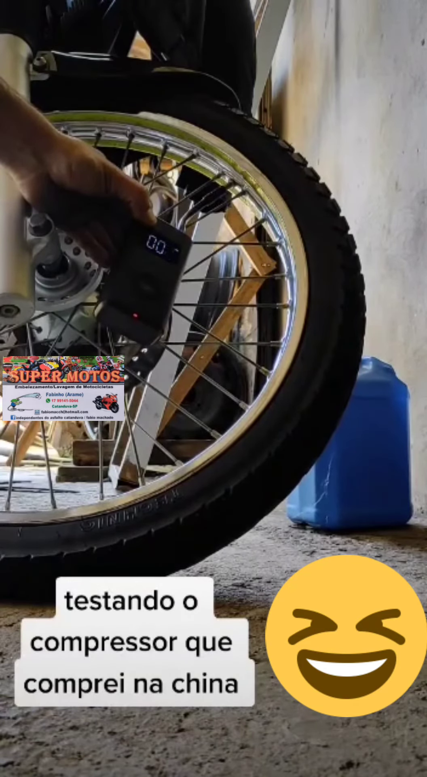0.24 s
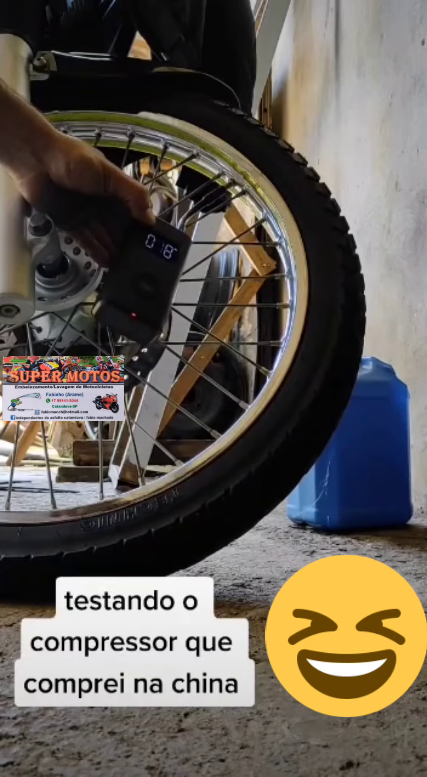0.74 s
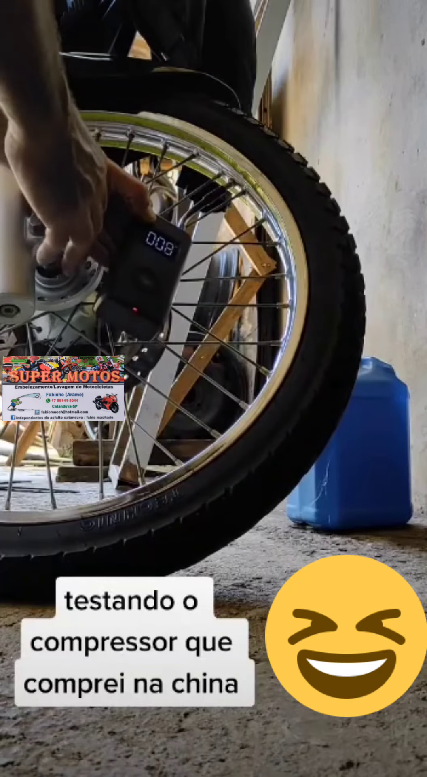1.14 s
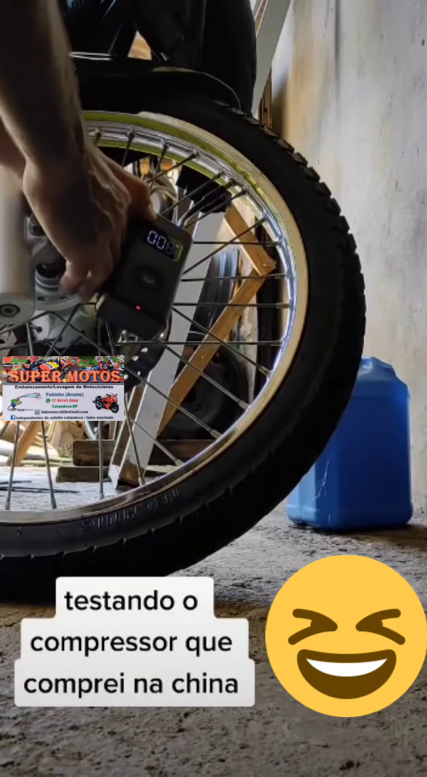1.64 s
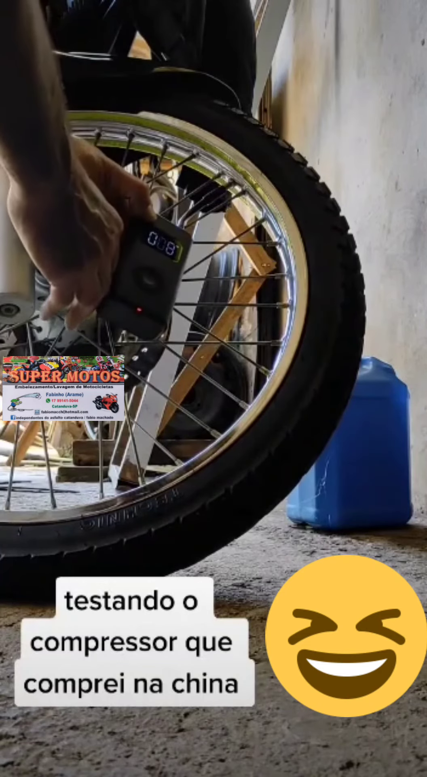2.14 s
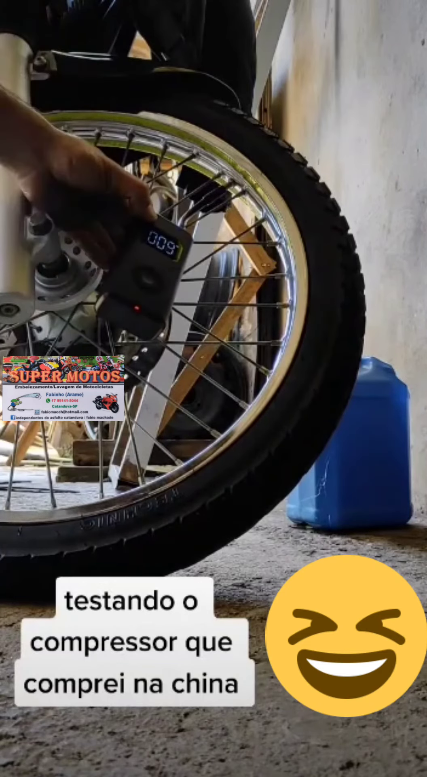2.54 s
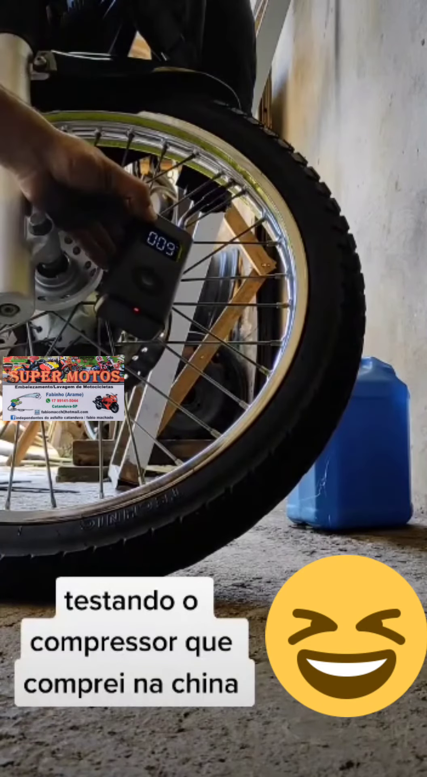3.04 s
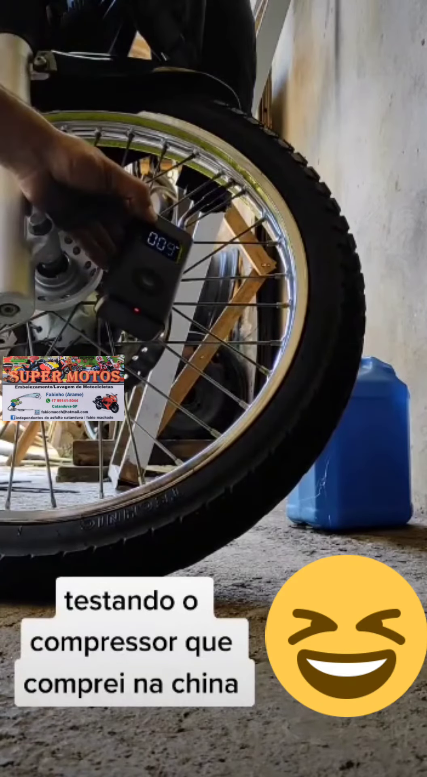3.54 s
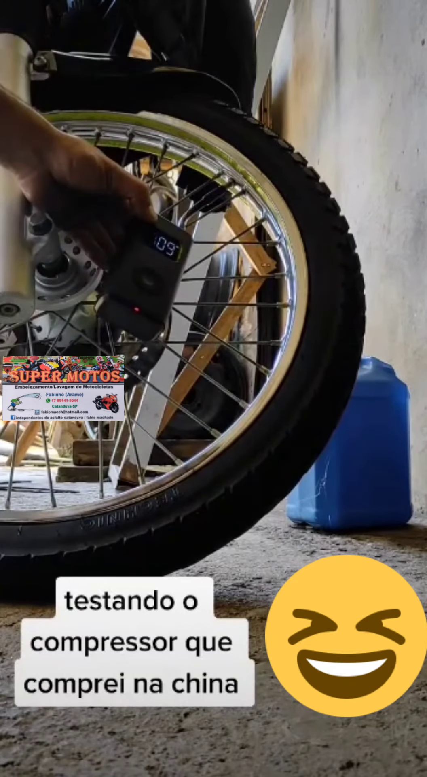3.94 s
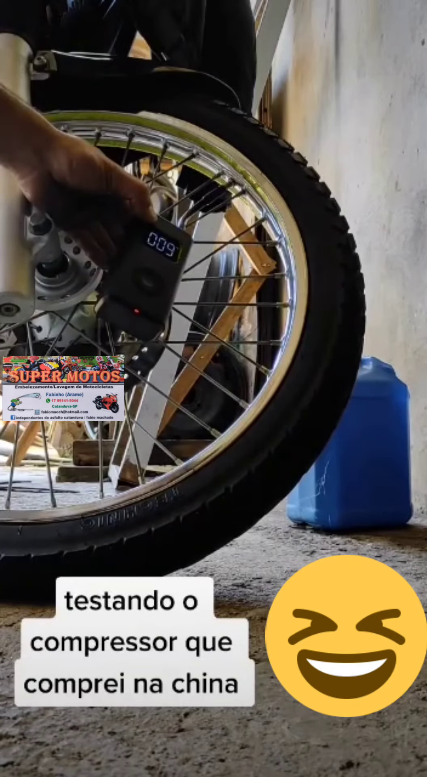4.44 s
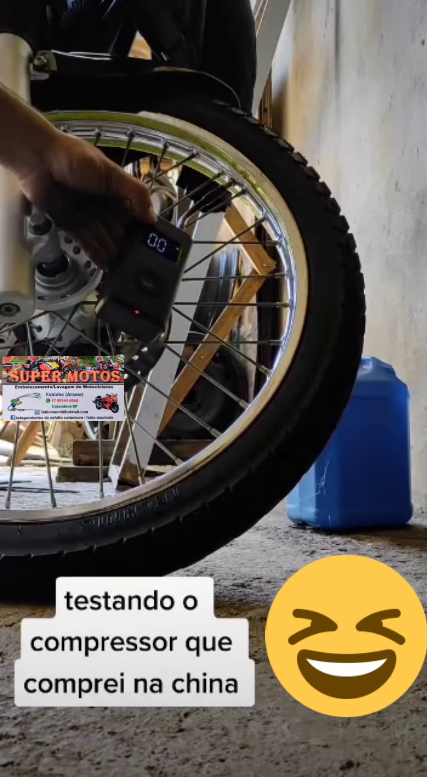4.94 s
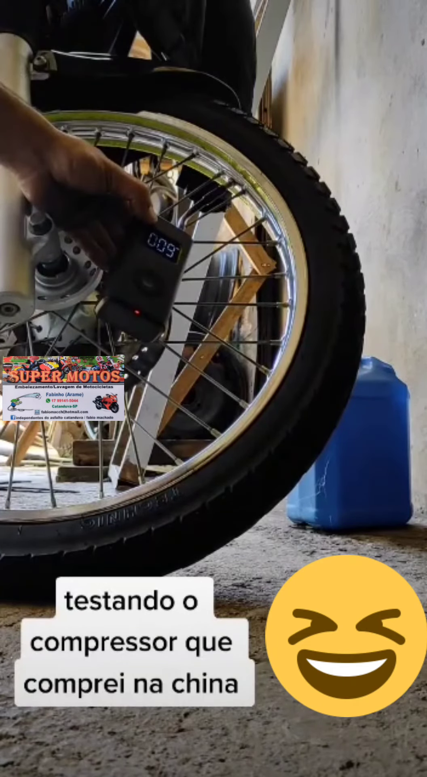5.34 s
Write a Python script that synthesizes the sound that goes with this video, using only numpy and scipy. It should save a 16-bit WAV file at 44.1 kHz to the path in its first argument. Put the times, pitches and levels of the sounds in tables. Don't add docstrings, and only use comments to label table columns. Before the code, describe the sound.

A small electric piston pump is already running at 0 s and continues for about 5.6 s without a gap. Close to the phone, roughly forty-four strokes a second blend into a hard, rattling buzz: low thump, metallic casing rings and a sharp valve tick in every turn, with gritty gear and air noise pulsing along. The pitch sinks very slightly, from about 44.6 to 44.3 turns per second, as pressure builds. Around 2.5 s a tighter grip gradually dulls the ring near 2.2 kHz. Fingers sliding over the vents make tiny dips and flares in brightness throughout. The treble is grainy, patchy and watery like heavy compression, with small high pips, densest around 0.9-1.7 s and 2.9-3.8 s. A stronger whistle near 7 kHz appears at 3.1-3.5 s, then a fainter, slightly higher one holds to the end. Stereo leans left, with little audible room; it stops abruptly mid-run.

```python
import sys
import numpy as np
from scipy import signal
from scipy.fft import rfft, irfft
from scipy.io import wavfile
from scipy.ndimage import uniform_filter1d

SR = 44100
rng = np.random.default_rng(int(sys.argv[2]) if len(sys.argv) > 2 else 0)


def level_to_linear(level):
    exponent = np.asarray(level, float) / 20
    return 10 ** exponent


def put_to_file(sound):
    columns = np.atleast_2d(sound).T
    safe = np.clip(columns, -1, 1)
    whole_steps = np.round(safe * 32767)
    wavfile.write(sys.argv[1], SR, whole_steps.astype(np.int16))


N = 246078
HZ = np.fft.rfftfreq(N, 1 / SR)
T = np.arange(N) / SR
FRAME = 1024

# (frequency [Hz], left [dB], right [dB], likeness [0-1])
BASS_PATH = [(25, -5.5, -19.5, 0.91), (45, -11.5, -12.5, 0.94), (130, -8.5, -14.5, 0.87),
             (241, -4, -8.5, 1), (323, -4.5, -9.5, 0.8), (477, -3, -8, 0.94), (710, 4, -4, 0.88),
             (930, 5.5, -4.5, 0.89), (1204, 2.5, -1.5, 0.5), (1420, 2, -9, 0.65), (1690, -0.5, -2, 0.03),
             (1620, -7.5, -3, 0.7), (2030, 2.5, 1, 0.3), (2240, 5.5, 6.5, 1)]
CASING_PATH = [(2380, -14, -2.5, 0.75), (2410, -2.5, 4, 0.39), (2833, -0.5, -8.5, 0.4),
               (3217, -14.5, -13, 0.49), (3475, -8.5, -10, 0.28), (3620, -17.5, -17.5, 0.47),
               (4427, 0, -8.5, 0.27), (4620, -14, -2.5, 0.46), (4700, -4, -8.5, 0.38), (5116, -4, -8, 0.44),
               (5270, -13, -21, 0.55), (5430, -3, -4, .45), (5710, -17, -17, 0.56),
               (5820, -2.5, -5.5, 0.62), (5940, -8.5, -10, .5), (6336, 4.5, -8.5, 0.98),
               (6423, 10.5, 10.5, 0.8)]
# (from [Hz], to [Hz], moved up by [Hz])
COPIES = [
    (1033.6, 6546.1, 5512.5),
    (2411.7, 5857, 9646.9),
]
# (start [s], end [s], frequency [Hz], level [dB])
HELD_TONES = [
    (2.8, 3.12, 13953.5, -48),
    (4.85, 5.58, 13953.5, -49),
    (3.1, 3.5, 7062.9, -31),
    (3.5, 5.58, 7752, -40),
    (0, .67, 12575, -55),
    (.95, 1.15, 12575, -55),
    (3.38, 4.1, 12575, -55),
]


def read(points, at, column=1):
    rows = np.transpose(points)
    return np.interp(np.log(at + 1), np.log(rows[0] + 1), rows[column])


def gains(path):
    return np.array([level_to_linear(read(path, HZ, column=side) - 60) * np.sqrt(SR / 2) for side in (1, 2)])


def wander(rate_hz, count=1):
    points = rng.standard_normal((count, 400))
    return np.array([np.interp(T * rate_hz, np.arange(400), p) for p in points]) * 1.22


def ports(z, path):
    # (frequency [Hz], lead [half turns])
    port_lead = [(950, 0), (1550, -1.15), (1890, -1), (2300, -2), (12100, -2), (13800, -1), (15100, -1),
                 (15500, -2)]
    lag_s = np.arange(4096) / SR
    reflections = rng.standard_normal(4096) * level_to_linear(-60 * lag_s / 0.054)
    smear = np.exp(1j * np.angle(rfft(reflections, N)))
    drift = np.exp(3j * wander(6)[0])
    other = rfft((signal.hilbert(irfft(z * smear, N)) * drift).real)
    half_angle = np.arccos(np.clip(read(path, HZ, column=3), 0, 1)) / 2
    shared, apart = np.cos(half_angle) * z, np.sin(half_angle) * other
    lead = np.exp(-1j * np.pi * read(port_lead, HZ))
    both = np.array([shared + apart, lead * (shared - apart)])
    return irfft(both * gains(path), N)


def tones():
    # (frequency [Hz], level [dB], chance per frame [0-1], left-right [dB])
    whistles = [
        (7062.9, -59, .4, 3),
        (7490, -33.5, 0.32, 2),
        (13953.5, -54, 0.18, 12),
    ]
    # (time [s], peak level [dB])
    pips = [(0.2443, -51), (0.3606, -33), (0.6659, -45), (0.7567, -36), (0.915, -28), (1.34, -32),
            (1.2072, -28), (1.2555, -21), (1.2945, -27), (1.475, -28), (1.6107, -30), (1.6616, -32),
            (2.0517, -44), (2.6339, -56), (2.8699, -35), (3.1378, -32), (3.2585, -31.5), (3.5663, -23.5),
            (3.32, -29.5), (3.7923, -33), (1.0, -49), (3.9799, -51), (4.131, -52), (4.2487, -41),
            (4.86, -40), (5.4635, -35)]
    pip_hz = 9819.1
    out, frame = np.zeros((2, N)), np.arange(N) // (2 * FRAME)
    for hz, db, chance, pan_db in whistles:
        on = uniform_filter1d(1. * (rng.random(200) < chance)[frame], 200)
        side_db = np.array([[pan_db], [-pan_db]]) / 2
        out += level_to_linear(db + side_db) * on * np.sin(2 * np.pi * hz * T)
    for start, end, hz, db in HELD_TONES:
        on = uniform_filter1d(1. * ((T > start) & (T < end)), 400)
        out += level_to_linear(db) * on * np.sin(2 * np.pi * hz * T) * [[1.4], [.6]]
    gate = np.full(N, level_to_linear(-66))
    for s, db in pips:
        gate += level_to_linear(db) * np.exp(-((T - s - .011) / .010) ** 4)
    return out + level_to_linear([[3], [-5]]) * gate * np.sin(2 * np.pi * pip_hz * T)


def fingers(hz, t):
    # (time [s], length [s], centre [Hz], level [dB])
    moves = [(0.1, .05, 7400, -6.5), (1.14, 0.027, 7000, -4), (1.21, 0.015, 6600, -10),
             (1.35, 0.059, 7900, 4), (1.6, .02, 6800, -13), (1.72, .03, 8300, -2.5), (1.98, 0.078, 8060, 3),
             (2.14, .03, 8100, -3.5), (2.434, 0.046, 7800, -3.5), (3.256, 0.012, 7600, -12),
             (3.277, .021, 7600, 5.5), (3.376, 0.068, 7700, -8.5), (3.488, 0.096, 6550, -2.5),
             (3.53, .03, 8400, -5), (4.065, 0.033, 8100, 5), (4.256, .022, 8000, -5),
             (4.865, 0.048, 8400, -5.5), (5.46, 0.029, 8600, -2.5)]
    width_hz = 1140
    change_db = 0
    for s, length, mid_hz, db in moves:
        band = np.exp(-((hz - mid_hz) / width_hz) ** 2)
        moment = np.exp(-((t - s) / length) ** 2)
        change_db = change_db + db * np.outer(band, moment)
    return change_db


def rebuilt(mono):
    # (frequency [Hz], left [dB], right [dB], likeness [0-1])
    treble_path = [(7140, 6, 2, 0.94), (6950, 2, 0.5, 0.91), (7190, 10, 12.5, 0.99), (7244, -3, -1, 0.9),
                   (7420, -7, -9, 0.8), (7630, -9, -3, 0.7), (7750, 13.5, -3, 0.38), (7830, -2, -6, 0.62),
                   (7994, 11, 7, 0.75), (8474, 8.5, -8, 0.29), (8790, -10.5, -17, 0.28),
                   (9090, -0.5, -16, 0.18), (9180, -18, -30, 0.21), (9860, -8.5, -28, 0.14),
                   (10100, -23.5, -29, 0.35), (10560, -14.5, -21, 0.01), (11100, -7.5, -21, 0.11),
                (11100, -14, -16, 0.07), (12430, -10.5, -19, 0.08), (12300, -16, -24, 0.28),
                (12500, -19, -32, 0.32), (13400, -12, -20, .3), (13500, -27, -37, 0.11),
                (13520, -14, -26, 0.31), (14040, -6.5, -24, 0.35), (15400, -15.5, -9, 0.29),
                (15700, -19, -27, 0.7)]
    z, flat = rfft(mono), np.zeros(len(HZ), complex)
    for low_hz, high_hz, up_hz in COPIES:
        a, b, up = (round(f * N / SR) for f in (low_hz, high_hz, up_hz))
        flat[a + up:b + up] = z[a:b] / np.sqrt(uniform_filter1d(abs(z[a:b]) ** 2, 900) / N)
    hz, t, z = signal.stft(ports(flat, treble_path), SR, nperseg=256)
    frame, band = (t * SR / FRAME).astype(int), (hz / 689).astype(int)
    steps = rng.standard_normal((300, 2, 40))[frame][:, :, band]
    steps_db = 1.1 * steps[:, :1] + 1.06 * steps
    level_db = steps_db.transpose(1, 2, 0) + fingers(hz, t) - 1
    return signal.istft(z * level_to_linear(level_db), SR, nperseg=256)[1][:, :N]


def thinned(x):
    # (frequency [Hz], level against the neighbourhood [dB], wander [dB])
    threshold = [(900, -24, 3), (1800, -8, 3), (3000, -5, 3), (3700, -2, 3), (4300, -6, 3), (5600, -2, 4.5),
                 (6800, -11, 3), (8500, -11, 3), (9200, -10, 6), (9700, -3, 9), (10300, 2, 7),
                 (11500, -3, 5), (13500, -6, 4), (14500, -5, 3), (15500, 3, 4)]
    # (start [s], end [s], from [Hz], to [Hz])
    slots = [(0, .67, 12150, 13000), (.95, 1.15, 12150, 12900), (3.38, 4.1, 12150, 13000),
             (2.8, 3.12, 13150, 14250), (4.88, 5.6, 13150, 14250), (2.85, 3.15, 11400, 11800),
             (4.9, 5.5, 5600, 5950), (.78, .88, 9250, 11000), (1.5, 1.6, 9250, 11000),
             (1.9, 2.04, 9250, 10500), (2.15, 2.22, 9250, 11000), (3.63, 3.75, 1800, 2050)]
    spared_hz = 70
    pair = np.array([[1, 0.93], [1, -1.03]])
    hz, t, z = signal.stft(pair @ x / 2, SR, nperseg=2048, noverlap=1536)
    patch = uniform_filter1d(rng.standard_normal(z[0].T.shape), size=24, axis=0)
    patch = uniform_filter1d(patch, size=7, axis=1).T
    patch_db = np.interp(hz, [1200, 3000, 9000, 11000], [0, 2.2, 2, 3])[:, None]
    z = z * level_to_linear(patch_db * patch / patch.std())

    power = uniform_filter1d(abs(z) ** 2, size=3, axis=2)
    near = uniform_filter1d(power, size=5, axis=1)
    around = uniform_filter1d(power.mean(0), size=41, axis=0)
    around = uniform_filter1d(around, size=9, axis=1)
    band = np.arange(len(hz)) // np.where(hz < 9000, 16, 32) + 30 * (hz >= 9000)
    drift = uniform_filter1d(rng.standard_normal((len(t), 70)), size=8, axis=0)[:, band].T
    wander_db = read(threshold, hz, column=2)[:, None] * drift / drift.std()
    keep = near > around * level_to_linear(2 * (read(threshold, hz)[:, None] + wander_db))
    spared = abs(hz[:, None] - np.transpose(HELD_TONES)[2]).min(1) < spared_hz
    for start, end, low_hz, high_hz in slots:
        emptied = (hz > low_hz) & (hz < high_hz) & ~spared
        keep = keep & ~np.outer(emptied, (t > start) & (t < end))
    return pair @ signal.istft(z * keep, SR, nperseg=2048, noverlap=1536)[1][:, :N]


def grind(turn):
    # (place [turns], level over the grind [dB], length [turns])
    flares_and_dips = [
        (.01, -2, .025),
        (.58, 3, 0.022),
        (.78, -3, 0.02),
        (.92, -8.5, 0.022),
    ]
    # (frequency [Hz], level against the mean [dB])
    grind_colour = [(30, -1), (80, -4.5), (300, -7.5), (900, -7.5), (1500, -4), (2300, -5.5), (3500, 1),
                    (6500, -2.5)]
    place = turn % 1
    level_db = 2.4 * np.cos(2 * np.pi * (place - .85)) + .5 * wander(40)[0]
    force = 1 + 0.11 * rng.standard_normal((300, len(flares_and_dips)))
    for k, (at, db, length) in enumerate(flares_and_dips):
        off = (place - at + .5) % 1 - .5
        this_turn = np.round(turn - at + 2).astype(int)
        level_db += db * force[this_turn, k] * np.exp(-(off / length) ** 2)
    noise = rng.standard_normal(N) * level_to_linear(level_db)
    return irfft(rfft(noise / noise.std()) * level_to_linear(read(grind_colour, HZ)), N)


def repeats(turn):
    # (multiple of crank rate, rms level [dB])
    thump = [(1, -60), (2, -55), (3, -75), (4, -50), (5, -61), (6, -51), (7, -61), (8, -56), (9, -55),
             (10, -48), (11, -54), (12, -55), (13, -51.5), (14, -50), (15, -53.5), (16, -52.5), (17, -57),
             (18, -52), (19, -48.5), (20, -45), (21, -45), (22, -46.5), (23, -44.5), (24, -52), (25, -49.5),
             (26, -53), (27, -59), (28, -62), (29, -45)]
    rings = [(33, -59), (34, -47.5), (35, -43), (36, -44), (37, -49), (39, -50), (44, -44), (45, -45.5),
             (48, -52), (49, -42.5), (50, -50.5), (51, -41.5), (56, -48), (57, -43), (58, -53), (59, -48.5),
             (62, -56), (63, -47.5), (78, -56), (92, -47.5), (96, -55), (97, -45), (98, -64), (99, -48.5),
             (104, -67), (106, -68), (107, -44.5), (139, -41), (145, -37.5), (146, -34.5)]
    motor = [(6.667, -64), (15.667, -56), (16.667, -56), (17.667, -53), (18.667, -53), (5.333, -70)]
    strike = [(1, 0.0099), (17, 0.0061), (19, 0.075), (22, -0.023), (24, -0.0593), (36, -0.0747),
              (50, -.13), (97, -.21), (146, -.3)]
    opposed = [
        (33, 46),
        (55, 58),
    ]
    multiples = np.arange(150)
    phase = .4 - 2 * np.pi * np.cumsum(read(strike, multiples))
    for first, last in opposed:
        phase = phase + np.pi * ((multiples >= first) & (multiples <= last))
    sway, out = wander(7, count=8), np.zeros(N)
    path = gains(BASS_PATH + CASING_PATH).mean(0)
    for n, (k, db) in enumerate(thump + rings + motor):
        loose = .004 * k
        height = np.sqrt(2) * level_to_linear(db) / np.interp(44.45 * k, HZ, path)
        level = 1 + loose / 2 * sway[n % 8]
        angle = 2 * np.pi * k * turn + phase[int(k)] + loose * sway[(n + 3) % 8]
        out += height * level * np.cos(angle)
    for k in range(25, 66):
        height = np.sqrt(2) * level_to_linear(-58) / np.interp(44.45 * k, HZ, path)
        out += height * np.cos(2 * np.pi * k * (turn - .012))
    return out


def scene():
    # (time [s], crank rate [turns/s])
    crank = [(0.0, 44.619), (0.62, 44.569), (1.24, 44.554), (1.86, 44.51), (2.48, 44.528), (3.1, 44.445),
             (3.72, 44.42), (4.34, 44.341), (4.96, 44.254), (5.58, 44.291)]
    loose_db, tight_db, tighten_s, tighten_length_s = 1, -3, 2.5, 0.31
    turn = -.144 + np.cumsum(np.interp(T, *np.transpose(crank))) / SR
    pump = repeats(turn) + grind(turn)
    ring = irfft(rfft(pump) / (1 + ((HZ - 2200) / 230) ** 4), N)
    grip_db = tight_db + (loose_db - tight_db) / (1 + np.exp((T - tighten_s) / tighten_length_s))
    return ports(rfft(pump + ring * (level_to_linear(grip_db) - 1)), BASS_PATH + CASING_PATH)


def top_cut(x):
    return signal.sosfilt(signal.butter(12, 15680, fs=SR, output="sos"), x)


def record(dry):
    kept = irfft(rfft(dry) * (HZ < COPIES[0][1]), N)
    mix = thinned(kept + rebuilt(kept.mean(0)) + tones())
    return top_cut(mix)


dry = scene()
out = record(dry)
put_to_file(out)
```